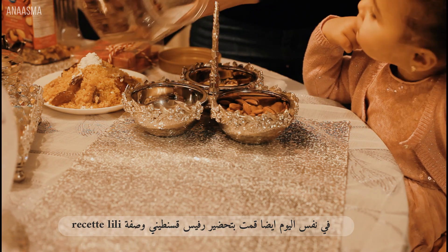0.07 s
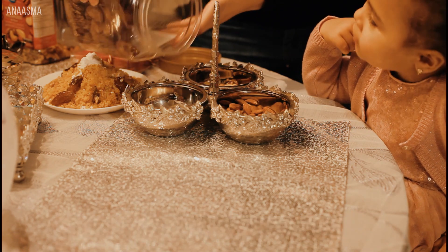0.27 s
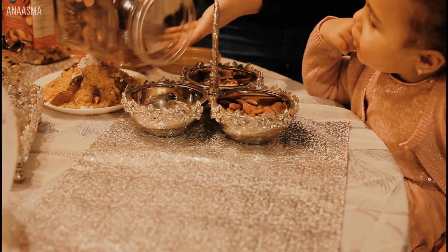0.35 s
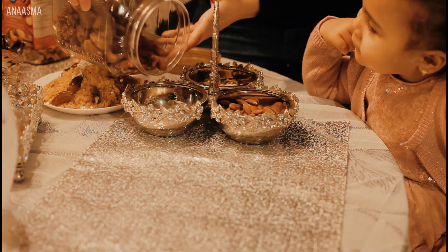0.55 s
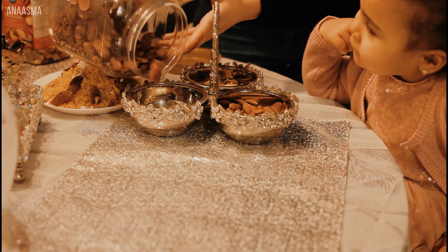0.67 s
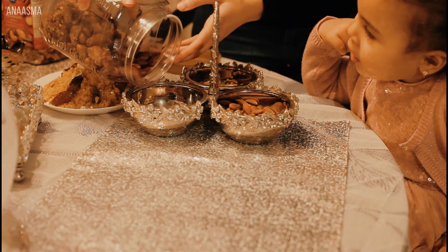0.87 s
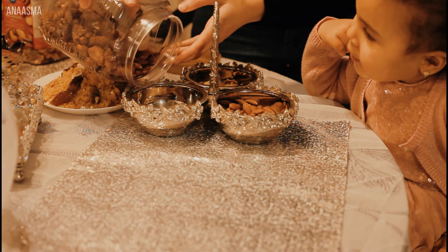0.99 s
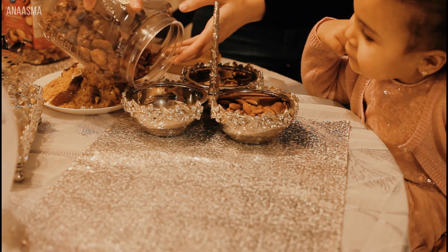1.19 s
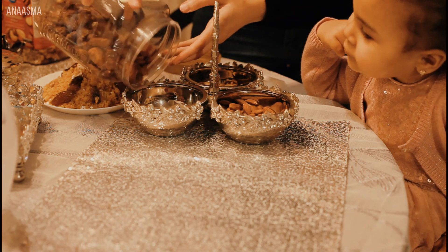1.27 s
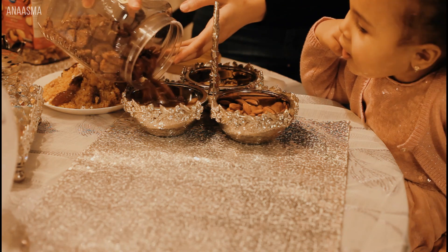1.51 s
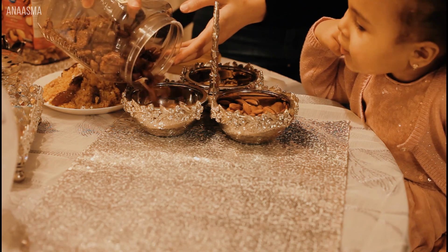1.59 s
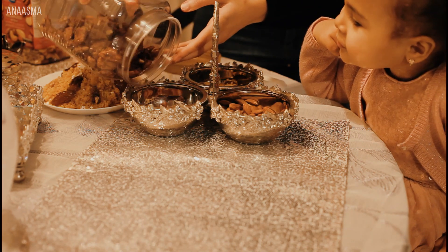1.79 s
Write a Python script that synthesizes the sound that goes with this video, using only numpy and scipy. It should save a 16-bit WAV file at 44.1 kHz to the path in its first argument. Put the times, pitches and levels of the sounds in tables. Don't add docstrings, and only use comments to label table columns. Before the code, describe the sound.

Nuts rattle and tumble in a hollow jar, then drop singly into a small metal dish

```python
import sys
import numpy as np
from scipy import signal
from scipy.fft import rfft, irfft
from scipy.io import wavfile

SR = 44100
rng = np.random.default_rng(int(sys.argv[2]) if len(sys.argv) > 2 else 0)


def rack_gain(trim_db):
    fader = np.asarray(trim_db, float)
    return 10 ** (fader / 20)


def bounce(signal):
    frames = np.transpose(np.atleast_2d(signal))
    limited = np.clip(frames, -1, 1)
    pcm = np.round(limited * 32767).astype(np.int16)
    wavfile.write(sys.argv[1], SR, pcm)


N = 81585


def evened(x):
    return x / np.sqrt(np.mean(x ** 2) + 1e-20)


def peaked(x):
    return x / np.abs(x).max()


def read(points, hz):
    f, value = np.transpose(points)
    return np.interp(np.log(hz + 1), np.log(f + 1), value)


def along(points):
    s, value = np.transpose(points)
    return np.interp(np.arange(N) / SR, s, value)


def add(mix, s, sound):
    part = mix[max(round(s * SR), 0):][:len(sound)]
    part += sound[:len(part)]


def tinted(x, shape):
    hz = np.fft.rfftfreq(len(x), 1 / SR)
    return irfft(rfft(x) * rack_gain(read(shape, hz)), len(x))


def above(x, hz):
    return signal.sosfilt(signal.butter(4, hz, "high", fs=SR, output="sos"), x)


def ring(modes, t60, t, sway_db, detune=0.011):
    hz, db = np.transpose(modes)[:, :, None]
    column = (len(modes), 1)
    strength = rack_gain(db + sway_db * rng.standard_normal(column))
    phase = 0.42 * rng.random(column)
    hz = hz * (1 + detune * rng.standard_normal(column))
    waves = strength * np.sin(2 * np.pi * (hz * t + phase))
    return peaked(waves.sum(0) * rack_gain(-60 * t / t60))


def ticks(per_s, spread_db):
    chance, size = rng.random(N), rng.exponential(1, N)
    sign = rng.choice([-1., 1.], N)
    return (chance < per_s / SR) * sign * rack_gain(spread_db * np.minimum(size, 4))


# start in seconds, thump level in dB,
# shell clack in dB against the thump, favoured wall pitch in Hz.
WALL_KNOCKS = [(0.002, -43, -4.5, 484), (0.098, -38.5, -32, 492), (0.15, -46, -6, 515),
               (0.224, -29, -12, 496), (0.256, -27.5, -4, 414), (0.267, -20.5, -7, 606),
               (0.276, -40, -4, 650), (0.295, -39, 6, 576), (0.325, -16, -4.5, 611), (0.336, -33, -24, 590),
               (.343, -43, -15, 480), (.378, -34.5, -6, 540), (0.383, -29.5, -1.5, 455),
               (0.391, -29.5, -3, 547), (.4, -38, -27, 490), (.412, -39, -25, 530), (.43, -47, 8, 537),
               (0.436, -39, -4, 600), (.448, -40.5, 6, 483), (.474, -44, 3, 480), (0.481, -34.5, 1.5, 453),
               (0.498, -25.5, -8, 561), (0.512, -32, -7.5, 540), (.518, -33.5, -1, 477),
               (0.527, -36.5, -4, 621), (.545, -46, 6, 510), (0.586, -40, -12, 560), (.606, -45, 3.5, 610),
               (0.631, -39, -1, 554), (0.685, -42, -0.5, 560), (0.744, -58, 4, 443),
               (0.762, -37.5, -9, 550), (1.085, -49, -2, 563), (1.207, -43, -6.5, 577),
               (1.255, -42, -10, 436), (1.28, -39.5, -18, 480), (1.289, -39.5, -9, 500),
               (1.297, -39.5, 0, 470), (1.311, -34.5, -2, 412), (1.333, -40.5, -1.5, 427),
               (1.359, -42, -11, 406), (1.393, -42.5, 2.5, 536), (1.411, -45, -13, 530),
               (1.432, -32.5, -17, 510), (1.466, -40, 9, 590), (1.68, -52, 0.5, 451)]
# time in seconds, level in dB.
HEAP_ROLL = [(0, -49), (.06, -64), (.2, -56.5), (.25, -40), (.42, -48.5), (.53, -51.5), (.58, -51),
             (.76, -55.5), (.82, -67.5), (1.18, -66.5), (1.24, -61), (1.31, -50), (1.37, -59), (1.44, -47),
             (1.5, -57.5), (1.53, -64.5), (1.7, -80), (1.76, -83)]
# pitch in Hz, level in dB.
JAR_MODES = [(290, -10.5), (345, -19.5), (430, -1.5), (480, 1.5), (540, 2.5), (580, -5.5), (625, 1.5),
             (700, -8), (1130, -11), (1270, -18)]
# frequency in Hz, level in
# dB.
CLACK_COLOUR = [(470, 2), (800, 2), (1340, 0), (2500, -1.5), (6400, -9), (7300, -25), (11000, -26),
                (16000, -50)]
JAR_T60_S, JAR_RISE_S, JAR_EDGE_HZ = 0.052, 0.0027, 290
FAVOUR_DB = 48
ROLL_PER_S = 720


def jar():
    out, t = np.zeros(N), np.arange(2600) / SR
    rise = np.minimum(t / JAR_RISE_S, 1) ** 2
    for s, db, clack_db, near_hz in WALL_KNOCKS:
        struck = [(hz, d - FAVOUR_DB * min(abs(np.log2(hz / near_hz)), .45)) for hz, d in JAR_MODES]
        fall = np.exp(-t / 0.017) + 0.21
        thump = peaked(ring(struck, JAR_T60_S, t, sway_db=3.5) * rise * fall)
        clump = rng.standard_normal(len(t)) * rack_gain(1.27 * rng.standard_normal(len(t)))
        clack = evened(tinted(clump, CLACK_COLOUR)) * np.exp(-t / 0.0055) * np.minimum(t / 0.0011, 1)
        add(out, s, rack_gain(db) * (rack_gain(-1.0) * thump + rack_gain(clack_db - 1.43) * clack))
    for _ in range(4):
        body = ring(JAR_MODES, JAR_T60_S, t, sway_db=3.5) * rise
        rolling = signal.oaconvolve(ticks(ROLL_PER_S / 4, spread_db=5.0), body)[:N]
        out += rack_gain(along(HEAP_ROLL) - 5.5) * evened(rolling)
    return above(out, JAR_EDGE_HZ)


# frequency in Hz, time to fall 60 dB in seconds.
ROOM_DECAY = [(300, 0.054), (1500, 0.29), (5000, 0.21), (14000, 0.11)]


def room(x):
    taps = np.zeros(SR // 2)
    at = np.arange(130, len(taps) - 20, 20)
    taps[at + rng.integers(0, 20, len(at))] = rng.choice([-1., 1.], len(at))
    hz, t, z = signal.stft(taps, SR, nperseg=256)
    fade = rack_gain(-60 * t / read(ROOM_DECAY, hz)[:, None])
    tail = signal.istft(z * fade, SR, nperseg=256)[1]
    return signal.fftconvolve(x, tail / np.linalg.norm(tail))[:N]


# time in seconds, level in dB.
SETTLE_LEVEL = [(0, -68), (.2, -67), (.26, -48), (.36, -49), (.45, -52), (.53, -48), (.6, -52.5),
                (.78, -60), (.84, -59.5), (1.08, -54), (1.12, -62), (1.24, -58.5), (1.31, -49.5),
                (1.36, -51.5), (1.47, -47.5), (1.64, -52), (1.77, -65), (1.8, -61.5)]
# time in seconds, share from 0 to 1.
DISH_SHARE = [(.8, 0.028), (.83, 0.27), (1.2, 0.67), (1.27, 0.033), (1.45, 0.36), (1.5, 1), (1.58, 0.79),
              (1.7, 0.23), (1.85, 0.45)]
# frequency in Hz, level
# in dB.
SHELL_COLOUR = [(470, -23), (800, -6), (1340, 3.5), (1810, 3), (6500, -5.5), (7300, -13.5), (10800, -19.5),
                (16000, -40.5)]
SETTLE_PER_S, SETTLE_BRIGHT_DB = 3500, -24


def settling():
    t, share = np.arange(5000) / SR, np.clip(along(DISH_SHARE), 0, 1)
    brief, shell, metal = t[:400], np.zeros(N), np.zeros(N)
    for hz in np.geomspace(750, 13000, 16):
        tick = np.sin(2 * np.pi * hz * brief) * np.exp(-brief * hz / 1.73) * hz
        shell += signal.oaconvolve(ticks(SETTLE_PER_S / 16, spread_db=4.0), tick)[:N]
    shell = above(tinted(shell, SHELL_COLOUR), JAR_EDGE_HZ)
    shell = evened(shell + rack_gain(-3.0) * room(shell))
    for _ in range(3):
        blow = dish_blow(-13.0, -0.5, SETTLE_BRIGHT_DB, t)
        metal += signal.oaconvolve(ticks(300, spread_db=1.0), blow)[:N]
    metal = evened(above(metal, DISH_EDGE_HZ))
    return rack_gain(along(SETTLE_LEVEL)) * (np.sqrt(1 - share) * shell + np.sqrt(share) * metal)


# frequency in Hz, level in dB.
AIR_COLOUR = [(18, -62), (30, -45), (866, -24), (1590, -21), (2350, 3.5), (5590, 7.5), (16000, -87)]


def still_air():
    return rack_gain(-67) * evened(tinted(rng.standard_normal(N), AIR_COLOUR))


# time in seconds, level in dB.
GRIP_LEVEL = [(0, -55.5), (.22, -62), (.4, -78), (.5, -72)]
# frequency in Hz, level in dB.
RUSTLE_COLOUR = [(18, -62), (30, -24.5), (259, -11), (336, -6.5), (540, -28), (822, -17), (5310, -18.5),
                 (16000, -35.5)]


def hands():
    return rack_gain(along(GRIP_LEVEL)) * evened(tinted(rng.standard_normal(N), RUSTLE_COLOUR))


# start in seconds, level in dB.
SHELL_SNAPS = [(0.1985, -56.5), (0.2427, -55), (0.256, -50), (0.27, -41), (.286, -48), (0.296, -44),
               (0.3245, -35), (0.3363, -43), (0.344, -47), (0.3853, -43), (.39, -49), (0.4303, -54),
               (0.451, -51), (0.475, -51), (0.482, -53), (0.499, -41), (0.515, -50), (.526, -50),
               (.6104, -56), (0.6216, -55.5), (0.6388, -53), (.6917, -54.5), (0.7125, -57), (0.805, -60),
               (.94, -73), (0.955, -44), (1.2747, -68), (1.3036, -53), (1.325, -54), (1.335, -59),
               (1.371, -55), (1.3936, -52), (1.411, -50.5), (1.454, -65), (1.4627, -49), (1.6333, -49),
               (1.6713, -59), (1.688, -58), (1.70, -59), (1.7302, -50.5), (1.795, -44)]
# frequency in Hz, level in dB.
SNAP_COLOUR = [(3000, -30), (5500, 4), (7500, -1), (11000, -2.5), (13500, -8), (16000, -23)]
SNAP_RISE_S, SNAP_S = 0.00078, 0.0026


def snaps():
    out, t = np.zeros(N), np.arange(900) / SR
    for s, db in SHELL_SNAPS:
        burst = evened(tinted(rng.standard_normal(len(t)), SNAP_COLOUR))
        add(out, s, rack_gain(db) * burst * np.minimum(t / SNAP_RISE_S, 1) * np.exp(-t / SNAP_S))
    return out


# start in seconds, level in dB.
HANDLING_BUMPS = [
    (0.265, -48),
    (0.329, -59),
    (0.386, -62),
    (0.499, -78),
    (1.469, -61),
    (1.495, -57),
]


def bumps():
    out, t = np.zeros(N), np.arange(3000) / SR
    push = 3 * (t / 0.0013) * (1 - t / 0.0047) * np.exp(-t / 0.0014)
    for s, db in HANDLING_BUMPS:
        add(out, s, rack_gain(db) * push)
    return out


# start in seconds, level in dB, pitch in Hz.
EDGE_GLINTS = [(.388, -40, 11000), (.805, -55, 4850), (0.956, -60, 13200), (1.066, -49, 13900),
               (1.066, -51, 11900), (1.082, -59, 9700), (1.086, -51, 12800), (1.463, -32, 4700),
               (1.551, -53, 11000), (1.566, -49, 9400), (1.601, -54, 11100), (1.604, -50, 13700),
               (1.718, -56.5, 13500), (1.733, -58, 11400)]
GLINT_CYCLES, GLINT_TAIL_DB, GLINT_SPREAD = 11, -28, .06


def glints():
    out, t = np.zeros(N), np.arange(1500) / SR
    for s, db, hz in EDGE_GLINTS:
        near = [(hz * k, 0) for k in np.geomspace(1 - GLINT_SPREAD, 1 + GLINT_SPREAD, 7)]
        fall = np.exp(-t * hz / GLINT_CYCLES) + rack_gain(GLINT_TAIL_DB) * np.exp(-t / 0.003)
        puff = ring(near, 0.16, t, sway_db=10.0) * fall * np.minimum(t / 0.00031, 1)
        add(out, s, rack_gain(db) * peaked(puff))
    return out


# start in seconds, level in dB, pitch in Hz.
CLEAR_PINGS = [
    (.393, -42, 3000),
    (.4365, -35.5, 3500),
    (.438, -39.5, 2450),
    (.641, -42.5, 3370),
    (1.5752, -42.5, 9610),
    (1.38, -41, 2200),
    (1.315, -37, 2300),
    (1.468, -36, 1140),
]
PING_S, PING_TAIL_S, PING_PAIR = .0025, .012, .012


def pings():
    out, t = np.zeros(N), np.arange(1500) / SR
    fall = (np.exp(-t / PING_S) + 0.08 * np.exp(-t / PING_TAIL_S)) * np.minimum(t / 0.00048, 1)
    for s, db, hz in CLEAR_PINGS:
        pair = np.sin(2 * np.pi * hz * t) + np.sin(2 * np.pi * hz * (1 + PING_PAIR) * t) / 2
        add(out, s, rack_gain(db) * fall * pair)
    return out


# pitch in Hz, level in dB.
DISH_CLUSTERS = [
    [(1120, 1), (1365, 8), (1540, 5), (1640, 13), (1720, 12), (1820, 8), (2130, -1)],
    [(3360, 3), (3440, 10), (3500, 12), (3770, -4)],
    [(5390, -22), (5660, -13), (5760, -13), (5850, -17), (6520, -25)],
    [(8420, 2), (9650, -3), (11600, -3), (13500, -6), (14100, -9), (15300, -9)],
]
CLUSTER_T60_S = [0.094, 0.076, 0.23, 0.24]
# frequency in Hz, level in dB.
STRIKE_COLOUR = [(530, -41), (900, -2), (1620, -21), (5820, 2.5), (7580, -20), (11800, -21.5), (16000, -51)]
CRACK_DB, CRACK_S = -2.5, 0.0015
RING_DB, QUICK_S, LINGER_DB = 1, 0.0028, -23
METAL_DETUNE = .005


def dish_blow(low_db, third_db, bright_db, t):
    cluster_db = np.array([low_db + 11.0, 0, third_db + 0.5, bright_db - 0.5])
    modes = np.zeros(len(t))
    for cluster, t60, db in zip(DISH_CLUSTERS, CLUSTER_T60_S, cluster_db):
        modes += rack_gain(db) * ring(cluster, t60, t, sway_db=7.0, detune=METAL_DETUNE)
    crack = evened(tinted(rng.standard_normal(len(t)), STRIKE_COLOUR))
    crack = crack * np.exp(-t / CRACK_S) * np.minimum(t / 0.00085, 1)
    sharp = evened(above(crack, 5580)) * np.sqrt(np.mean(crack ** 2))
    crack += rack_gain(bright_db - cluster_db.max() + 16.0) * sharp
    fall = (np.exp(-t / QUICK_S) + rack_gain(LINGER_DB)) * np.minimum(t / 0.0002, 1)
    return rack_gain(RING_DB) * modes * fall + rack_gain(CRACK_DB + cluster_db.max()) * crack


# start in seconds, level in dB, lowest cluster in dB,
# third cluster in dB, bright cluster in dB.
DISH_DROPS = [(0.8226, -39.5, 7.5, -0.5, -1), (0.8332, -49.5, 8, -7, -2), (0.8826, -37, -8, -35, -24),
              (0.9251, -39, -4.5, -0.5, -26), (0.9624, -41, -4.5, 2, -6.5), (1.0043, -45.5, 4, -14, -16),
              (1.0253, -29.5, -8.5, -4, -19), (1.1377, -37, -12.5, -11, -13), (1.1836, -49.5, -8, 3, -6),
              (1.2486, -45.5, -22, -23, -16), (1.4675, -32, -20, -2.5, -14), (1.4902, -27, -11.5, -2, -27),
              (1.4965, -37, -2, -8, -1.5), (1.5768, -35.5, -10, -6, -12.5), (1.722, -38, -10, -9, -28),
              (1.787, -52.5, -4, 2, -1), (1.7917, -33.5, -23.5, -6, -27.5)]
DISH_EDGE_HZ = 1030


def dish():
    out, t = np.zeros(N), np.arange(5000) / SR
    for s, db, *colour in DISH_DROPS:
        add(out, s, rack_gain(db) * dish_blow(*colour, t))
    return above(out, DISH_EDGE_HZ)


JAR_WET_DB, DISH_WET_DB = -10, -6


def scene():
    hollow = jar()
    metal = dish() + glints() + snaps() + pings()
    wet = room(rack_gain(JAR_WET_DB) * hollow + rack_gain(DISH_WET_DB) * metal)
    return (hollow + metal + wet + settling() + bumps() + still_air() + hands())[None]


def low_pass(x):
    return signal.sosfilt(signal.butter(12, 16460, fs=SR, output="sos"), x)


CEILING, EDGE_HZ = .086, 16250


def record(dry):
    limited = dry / (1 + np.abs(dry / CEILING) ** 4) ** (1 / 4)
    mix = signal.oaconvolve(limited, signal.firwin(255, EDGE_HZ, fs=SR)[None], "same")
    return low_pass(mix)


dry = scene()
out = record(dry)
bounce(out)
```